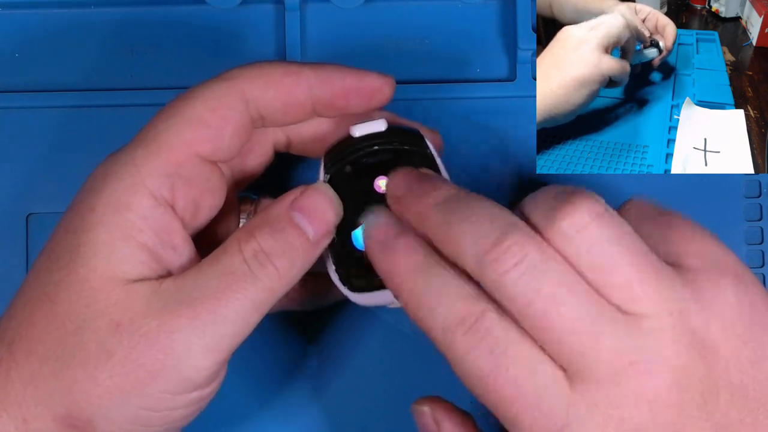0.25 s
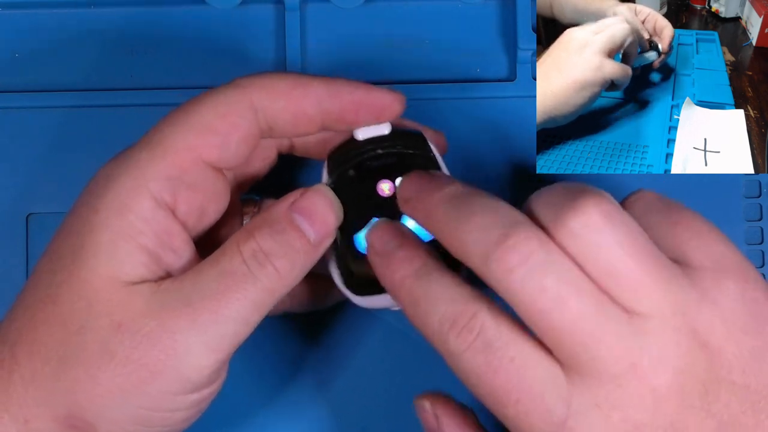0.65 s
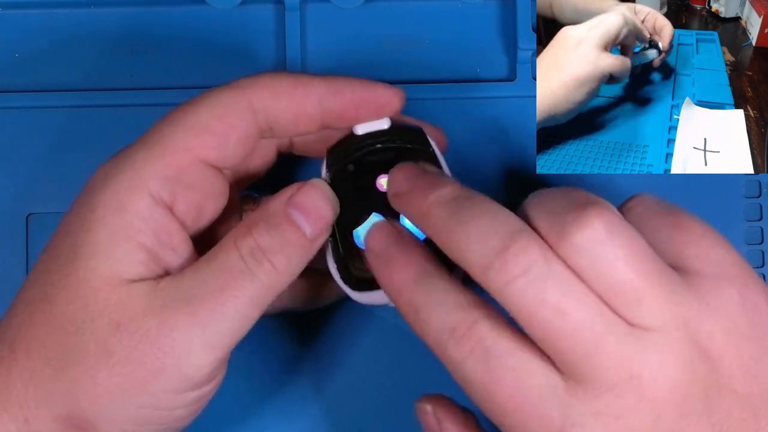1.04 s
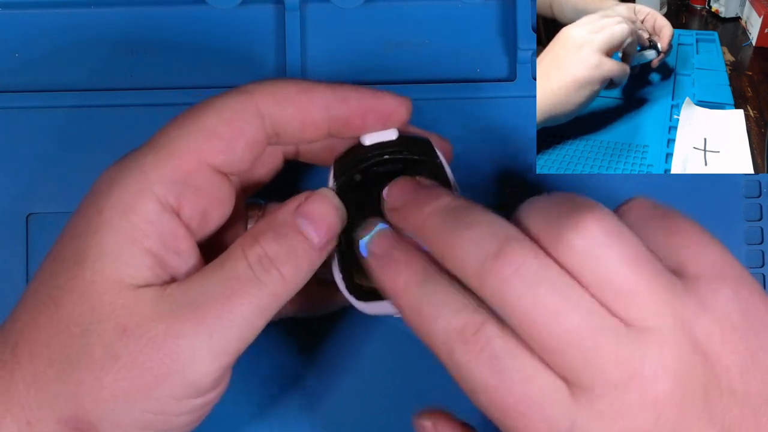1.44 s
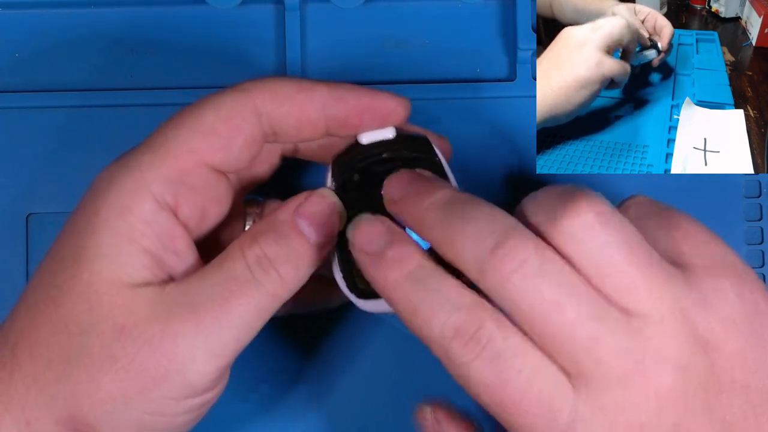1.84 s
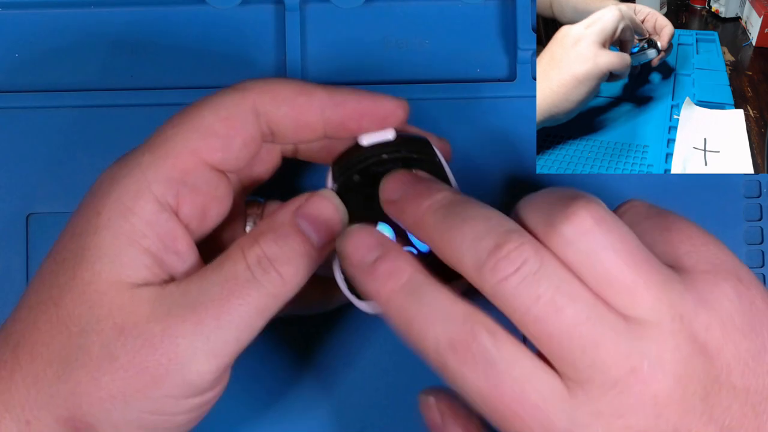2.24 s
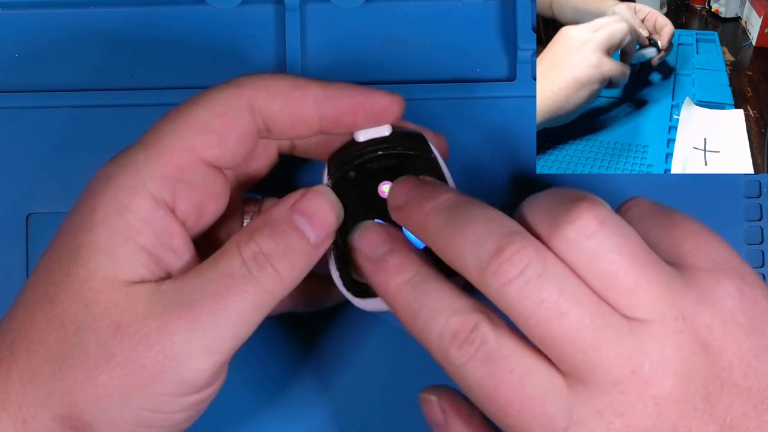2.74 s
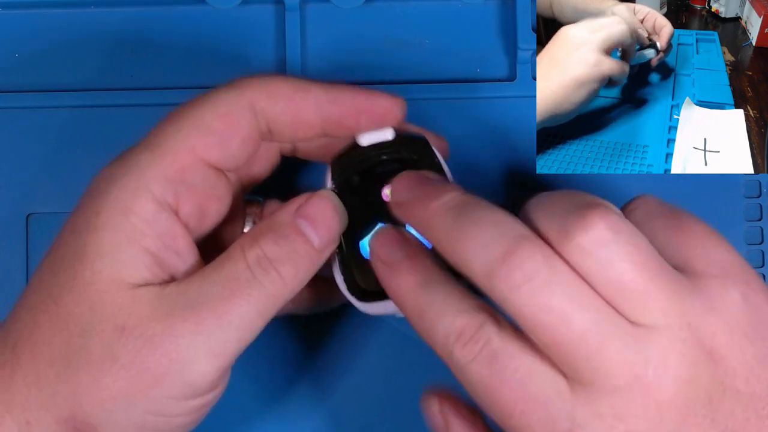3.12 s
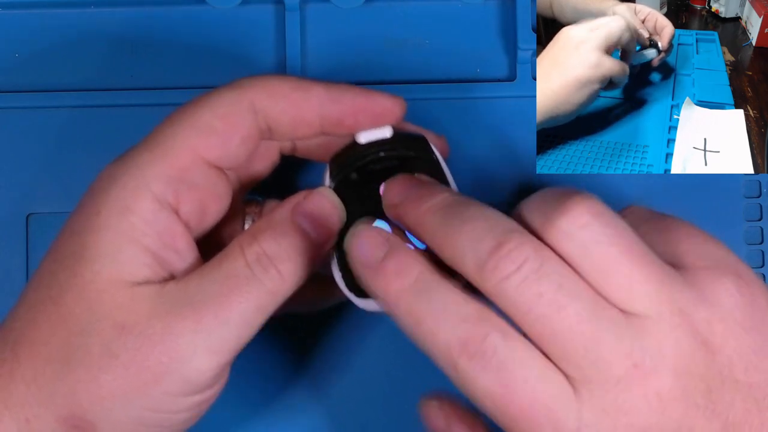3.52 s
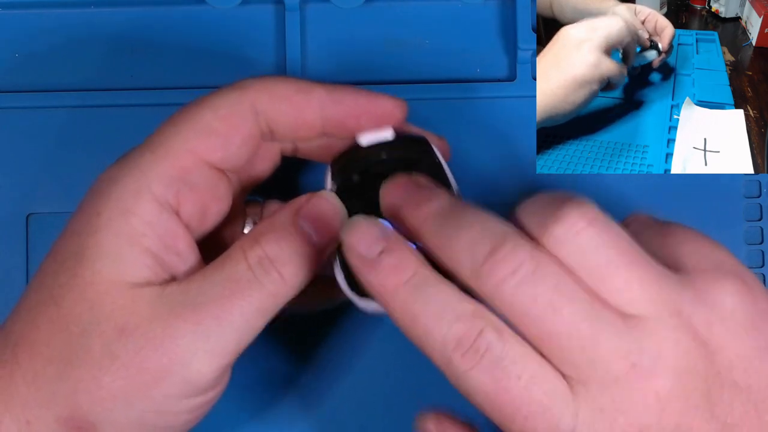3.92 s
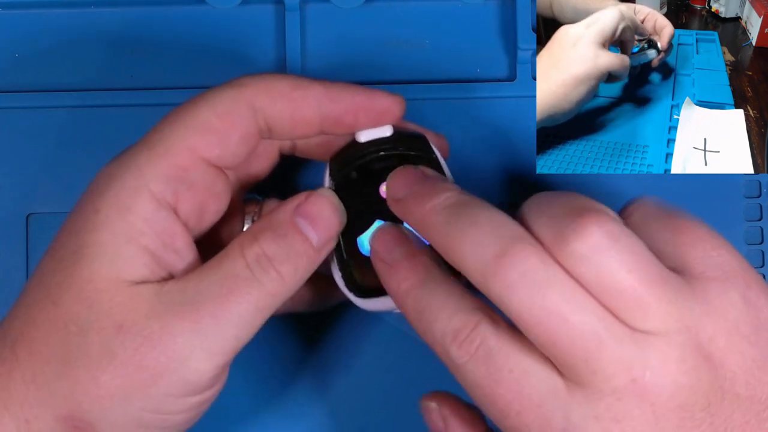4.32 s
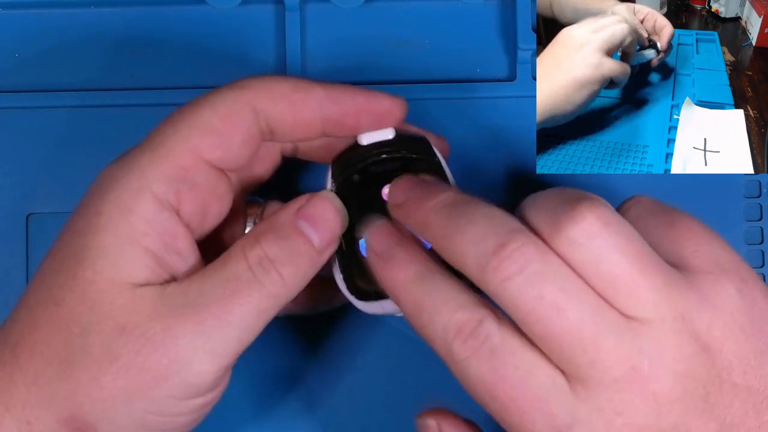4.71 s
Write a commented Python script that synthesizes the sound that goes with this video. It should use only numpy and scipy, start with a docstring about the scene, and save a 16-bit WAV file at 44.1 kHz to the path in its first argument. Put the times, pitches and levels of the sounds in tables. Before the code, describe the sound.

Fast, light fingertip taps make a small plastic toy watch tick and chatter in uneven clusters, with low desk bumps beneath in a quiet room.

```python
"""A small plastic toy watch, held over a desk, ticks under fast fingertip taps: its loose part strikes and
chatters in noisy contacts that ring the modes of the body, and a small room answers with sparse echoes. Soft
knocks sound on and near the desk top, hands rub and rustle in filtered noise, and desk jolts shake the
microphone stand, which rings very low with a locked overtone. Behind lie room hiss and thin electrical hum. A
noise suppressor turns everything down, the bass less, while the treble is weak."""
import sys
import numpy as np
from scipy import signal
from scipy.fft import rfft, irfft
from scipy.io import wavfile
from scipy.ndimage import uniform_filter1d

SR = 44100
rng = np.random.default_rng(int(sys.argv[2]) if len(sys.argv) > 2 else 0)


def inscribe(sig):
    """Save sig as 16-bit PCM at rate SR to the path in sys.argv[1].

    A 1-D sig is mono; a 2-D sig holds one channel per row.
    Samples are clipped to [-1, 1] before scaling.
    """
    pcm = np.round(np.clip(np.atleast_2d(sig).T, -1, 1) * 32767)
    wavfile.write(sys.argv[1], SR, pcm.astype(np.int16))


N = 218824

# Ticks of the loose part. Each row: time in seconds, level in dB, landing spot from 0 (case) to 1 (glass),
# extra level of the back lid's mode in dB.
TICKS = [(0.0151, -53, 0.05, 0), (0.0321, -40.5, 0.64, 4.5), (0.037, -43.5, 0.56, 4),
         (0.159, -52.5, 0.19, 1), (0.1703, -48.5, 0.057, 17), (0.1724, -40.5, 0.72, 2.5),
         (0.205, -52.5, 0.22, 3), (0.299, -57.5, 0.5, -5.0), (0.3033, -48.5, 0.56, 7),
         (0.3104, -39.5, 0.43, -0.5), (0.3282, -34.5, 0.86, 8), (0.3622, -45.0, 0.16, 1),
         (0.3644, -52, 0.98, -7), (0.473, -64, 0.35, 3), (0.4817, -50.5, 0.4, 5.5),
         (0.4895, -47.5, 0.29, 8.0), (0.63, -54, 0.14, -9), (0.6413, -50.5, 0.23, 4.5),
         (0.6542, -51, 0.74, 7), (0.7375, -57, 0.079, 17), (0.7498, -50, 0.73, 8), (0.8093, -47, 0.29, 1),
         (0.8965, -58.0, 0.2, 3), (0.9047, -49.5, 0.59, 1.5), (0.913, -46, 0.53, 8.5),
         (0.9616, -48.5, 0.066, 4.5), (0.9801, -50.5, 0.32, 1), (1.0618, -52.5, 0.05, 4),
         (1.073, -55, 1, 14.5), (1.1373, -53.5, 0.16, 2), (1.2203, -51, 0.16, 7.5), (1.23, -48.0, 0.46, 3),
         (1.3088, -54, 0.1, -1), (1.392, -53.5, 0.16, -2.0), (1.4022, -44.5, 0.67, 6.5),
         (1.416, -45.5, 0.74, 0), (1.4638, -55.5, 0.41, 3), (1.5604, -54, 0.28, -6),
         (1.6713, -53.5, 0.031, 5), (1.7344, -58.5, 0.032, 6.5), (1.8448, -52, 0.084, 9.5),
         (1.8592, -48.5, 0.16, -7), (1.9236, -45, 0.29, 1), (2.0189, -52.5, 0.035, -4),
         (2.0293, -52.5, 0.16, -6.0), (2.098, -51.5, 0.24, -4), (2.1058, -53, 0.37, 16),
         (2.1912, -50, 0.2, 2.5), (2.2729, -51.5, 0.08, 8), (2.2801, -48, 0.61, 1), (2.3161, -51, 0.46, 7),
         (2.3384, -46.5, 0.25, 0.5), (2.4318, -48.5, 0.45, 0), (2.4385, -49.5, 0.27, 1),
         (2.445, -49.0, 0.57, 3), (2.45, -45, 0.35, 3.5), (2.6887, -60, 0.47, 5), (2.693, -47.5, 0.35, 4),
         (2.7046, -42, 0.37, 4.5), (2.7099, -55, 0.38, 8.0), (2.7823, -39, 0.33, -20),
         (2.7908, -35.5, 0.76, -1.5), (2.7929, -34.5, 0.078, -5), (2.8017, -36, 0.28, -22),
         (2.873, -43, 0.34, 6), (2.8817, -47, 0.8, 11.5), (2.8872, -48.5, 0.17, 1),
         (2.9584, -45, 0.062, -6), (2.9636, -46, 0.14, 2.5), (3.0609, -46.5, 0.63, 2),
         (3.1287, -50, 0.31, 0), (3.1398, -47, 0.16, -1.5), (3.2053, -55, 0.33, 9),
         (3.2207, -51, 0.05, 8.0), (3.2324, -44, 0.62, 5), (3.2846, -65, 0.29, 14),
         (3.29, -45.0, 0.057, 2.5), (3.2942, -44.5, 0.44, 1), (3.3802, -48, 0.039, 5),
         (3.3885, -42.5, 0.35, 3.5), (3.3947, -44.5, 0.49, 2.5), (3.5399, -53.5, 0.05, 6.5),
         (3.7081, -53.5, 0.24, -2), (3.7144, -42.5, 0.46, -7), (3.718, -39.5, 0.17, -3.5),
         (3.7786, -43.5, 0.21, 0), (3.8028, -40.5, 0.35, 12.5), (3.8133, -43, 0.51, 8),
         (3.8142, -47, 0.2, -2), (3.8256, -52, 0.88, 5), (3.876, -39.5, 0.5, 0.5), (3.8885, -41, 0.19, -2),
         (3.8915, -58, 0.14, 4), (3.9623, -53.5, 0.55, 0.0), (4.0491, -48, 0.14, 2),
         (4.061, -52.5, 0.14, 1), (4.1372, -45.5, 0.31, 3.5), (4.1467, -45.5, 0.57, 1),
         (4.213, -44, 0.28, -2), (4.2243, -38.5, 0.26, -3.5), (4.3082, -45.0, 0.044, 0),
         (4.3204, -40.5, 0.71, 4.5), (4.333, -48, 0.65, 5), (4.399, -49.5, 0.041, -6),
         (4.467, -48.5, 0.27, -4), (4.5182, -51, 0.12, 1), (4.5532, -51.5, 0.093, -2),
         (4.633, -51.5, 0.23, 1), (4.7534, -56, 0.058, 1), (4.7776, -63.5, 0.046, 1),
         (4.8503, -56, 0.33, -6), (4.863, -60, 0.16, -1), (4.952, -50, 0.24, -3.0), (4.9579, -34, 0.36, -6)]
# Modes of the toy. Each row: frequency in Hz, width in Hz, level in dB struck on the case,
# level in dB struck on the glass.
TOY_MODES = [(1720, 10, -27, -36), (2700, 226, -9, -18), (3550, 2130, -13, -7), (4572, 210, -10, -3.5),
             (5620, 920, -4.5, -9), (6630, 370, -2, -18), (7754, 560, -1.5, -10.5), (9294, 440, -9, 7),
             (10910, 1200, -19.5, 11), (13200, 1500, -21, -5.5), (13800, 5800, -25.5, -4.5),
             (13700, 850, -38.5, -9.5)]
# Decay of the room. Each row: frequency in Hz, time to fall 60 dB in seconds.
ROOM_DECAY = [(2500, 0.45), (5000, 0.43), (9000, 0.25), (12000, 0.22), (15000, 0.29)]
# Colour of the room; the hands shade the low modes from it. Each row: frequency in Hz, level in dB.
ROOM_COLOUR = [(2700, -2), (3600, 0), (4600, -4), (6000, 0)]
# Dull knocks, the first two on the desk top and the last on a nearby object, all sounding through the same low
# modes. Each row: time in seconds, level in dB, tilt in dB per octave above the lowest mode, # rise in ms,
# share of the free ring time.
KNOCKS = [(0.7724, -51, -5, 3.6, 0.89), (0.7796, -50, -4, 2.1, 1), (0.919, -67.5, 3, 0.7, 0.61)]
# Modes of the desk top. Each row: frequency in Hz, free time to fall about 30 dB in seconds, level in dB.
DESK_MODES = [(131, .035, 0), (350, 0.016, 5), (540, 0.011, 3), (845, 0.011, 5), (1310, 0.007, 2)]
# Jolts of the desk. Each row: peak time in seconds, relative stand level in dB, overtone in dB below that
# (before the mix gains), time to fall 60 dB in seconds.
JOLTS = [(0.062, -56.5, 4, 0.59), (0.164, -50.5, 23, 0.17), (0.266, -52.5, 19, 0.29),
         (0.344, -53.5, 5, 0.23), (0.512, -61, 8, 0.34), (0.68, -61.5, 19, 0.16), (0.991, -52.5, 9, 0.31),
         (1.207, -56, 17, 0.42), (1.444, -54, 22, 0.18), (1.905, -52, 15, 0.48), (2.144, -58.5, 8, 0.33),
         (2.331, -42, 13, 0.45), (2.467, -45.5, 19.5, 0.49), (2.669, -44.5, 15, 0.69),
         (2.821, -42, 9, 0.36), (2.915, -43, 4.5, 0.28), (3.05, -51.5, 4, 1), (3.23, -40, 7, 0.63),
         (3.334, -42.5, 12.5, 0.63), (3.481, -48, 5, 0.92), (3.781, -38, 3.5, 0.82),
         (4.185, -39.5, 7, 0.19), (4.28, -41.5, 10, 0.4), (4.348, -45.5, 6.5, 0.35),
         (4.533, -46, 3.5, 0.45), (4.878, -51, 13, 0.95)]
# Spectrum of the slow pushes. Each row: frequency in Hz, relative density in dB per Hz.
THUMP_SPECTRUM = [(8, 1.5), (26, -12), (45, -25.5), (90, -24), (140, -31), (200, -68.5)]
# Spectrum of the hand rustle. Each row: frequency in Hz, relative density in dB per Hz.
RUSTLE_SPECTRUM = [(70, -14.5), (120, -2), (210, 2), (310, -1), (450, -7.5), (700, -25), (2000, -84)]
# Hands rubbing the desk. Each row: start in seconds, length in seconds, relative level in dB, pitch in Hz.
RUBS = [(-.02, .12, -64.5, 278), (0.045, 0.052, -84, 407), (1.412, 0.107, -78.5, 296),
        (2.992, 0.19, -70, 280), (3.218, 0.098, -69, 265), (3.309, 0.13, -74.5, 321),
        (3.921, 0.055, -76, 332), (4.176, 0.046, -74, 368)]
# Spectrum of the room hiss. Each row: frequency in Hz, relative density in dB per Hz.
HISS_SPECTRUM = [(59, -28.5), (100, -4.5), (163, -9), (736, -27.5), (2170, -30), (2800, -12.5), (3700, -29),
                 (4570, -19.5), (7610, -21), (16000, -27.5)]
# Electrical hum. Each row: frequency in Hz, rms level in dB.
HUM = [(199.2, -92), (597.5, -104), (1001, -103.5)]
# Left-right likeness of all noises. Each row: frequency in Hz, likeness from 0 to 1.
LIKENESS = [(60, 0.95), (300, 0.77), (1400, 0.86), (15000, 0.7)]

LID_MODE = 3  # place of the back lid's mode in TOY_MODES
REBOUND_MS, REBOUND_DB = 5.0, -8  # average delay and relative level of the rebound
ROOM_DB, HISS_DB = -2.5, -80
STAND_HZ, STAND_PAN_DB = 30, -0.4  # pans are left over right
JOLT_RISE_S, REST_DB = 0.024, -71  # swing build-up, and its relative level at rest
PUSH_DB, PUSH_S = -10.5, 0.0058  # short shove at each jolt's peak, relative to the jolt
STIR_DB, STIR_SWING_DB, STIR_SHARE = -75, -40.5, 0.43  # rustle level at this swing; dB of rustle per dB of swing
RUB_EDGE_S, RUB_WIDTH_HZ, RUB_PAN_DB = 0.012, 72, 2.5
BASS_CUT = 0.37  # share of the suppressor's cut, in dB, that also reaches the bass
EDGE_HZ = 15900  # upper band limit


def amp(db):
    """Turn dB into an amplitude factor."""
    return 10 ** (np.asarray(db) / 20)


def evened(x):
    """Scale to an rms of one."""
    return x / np.sqrt(np.mean(x ** 2) + 1e-20)


def read(points, hz):
    """Read a curve between its points along a logarithmic frequency axis."""
    f, value = np.transpose(points)
    return np.interp(np.log(hz + 1), np.log(f + 1), value)


def noise(spectrum):
    """Two partly alike channels of noise with the given spectrum, at an rms of one."""
    hz = np.fft.rfftfreq(N, 1 / SR)
    left, other = rfft(rng.standard_normal((2, N)))
    same = np.clip(read(LIKENESS, hz), 0, 1)
    right = same * left + np.sqrt(1 - same ** 2) * other
    return evened(irfft(np.array([left, right]) * amp(read(spectrum, hz)), N))


def ring(hz, width, t):
    """One exponentially dying mode with a soft start; a wider mode dies faster."""
    return np.sin(2 * np.pi * hz * t) * np.exp(-np.pi * width * t) * (1 - np.exp(-t / .00016))


def rattles():
    """The loose part rebounds: each tick gets one weaker tick just after it, landing close by."""
    rebounds = []
    luck = rng.random((len(TICKS), 2))
    for (s, db, spot, lid_db), (late, slip) in zip(TICKS, luck):
        delay_s = REBOUND_MS * (.5 + late) / 1000
        rebounds.append((s + delay_s, db + REBOUND_DB, spot * (.5 + slip), lid_db))
    return [tick for tick in list(TICKS) + rebounds if tick[0] < N / SR]


def part_contacts(count):
    """The part strikes, chatters and skips to rest: sparse random contacts under a dying envelope."""
    t = np.arange(2000) / SR
    hits = rng.standard_normal((count, 2000)) * (rng.random((count, 2000)) < .22)
    skips = np.repeat(rng.random((count, 40)) < .12, 50, axis=1)  # brief late contacts
    strike = (1 - np.exp(-t / 0.0007)) * np.exp(-t / 0.003)
    return hits * (strike + 0.53 * skips * np.exp(-t / 0.02))


def toy_body(spot, lid_db, luck):
    """Modes of the case and glass, weighted by landing spot and slightly retuned by the fingers' grip."""
    t = np.arange(400) / SR
    spot = np.clip(spot, 0, 1)
    shift_db = 1.6 * luck[:, 0]
    shift_db[LID_MODE] += lid_db
    grip = 1 + .04 * luck[:, 1]
    body = np.zeros(len(t))
    for k, (hz, width, case_db, glass_db) in enumerate(TOY_MODES):
        level_db = case_db + spot * (glass_db - case_db) + shift_db[k]
        direction = (-1) ** k  # neighbouring modes start in opposite directions
        body += direction * amp(level_db) * np.sqrt(width) * ring(hz * grip[k], width, t)
    return body


def toy():
    """Each tick is a scatter of contacts exciting the toy's modes, with the lows of the sum filtered away."""
    out = np.zeros(N + 2600)
    ticks = rattles()
    spread = rng.standard_normal((len(ticks), len(TOY_MODES), 2))
    for (s, db, spot, lid_db), contacts, luck in zip(ticks, part_contacts(len(ticks)), spread):
        tick = np.convolve(contacts, toy_body(spot, lid_db, luck))
        tick /= 3 * tick[:180].std()  # the peak is about three times the rms of the first 4 ms
        at = round(s * SR)
        out[at:at + len(tick)] += amp(db) * tick
    return signal.sosfilt(signal.butter(5, 2250, "high", fs=SR, output="sos"), out[:N])


def room(x):
    """Sparse echoes of random sign, mostly shared by both channels, each band dying at its own speed."""
    taps = np.zeros((3, SR // 2))
    at = np.arange(120, SR // 2 - 12, 12)
    at = at + rng.integers(0, 12, (3, len(at)))  # one echo at a random place in each short slot
    np.put_along_axis(taps, at, rng.choice([-1., 1.], at.shape), 1)
    hz, t, bands = signal.stft(taps[0] + 0.91 * taps[1:], SR, nperseg=128)
    decay_db = -60 * t / read(ROOM_DECAY, hz)[:, None]
    build_up = 1 - np.exp(-t / 0.0034)
    bands = bands * amp(read(ROOM_COLOUR, hz)[:, None] + decay_db) * build_up
    tail = signal.istft(bands, SR, nperseg=128)[1]
    return signal.fftconvolve(x[None], tail / np.linalg.norm(tail[0]), axes=1)[:, :N]


def knocks():
    """Soft blows ring a shared set of low modes, those of the desk top; a tilt per blow favours the upper or
    lower modes."""
    t = np.arange(N) / SR
    out = np.zeros(N)
    for at, db, tilt_db, rise_ms, free in KNOCKS:
        since = np.maximum(t - at, 0)
        modes = np.zeros(N)
        for hz, fall_s, mode_db in DESK_MODES:
            octaves = np.log2(hz / DESK_MODES[0][0])
            modes += amp(mode_db + tilt_db * octaves) * ring(hz, 1.08 / (free * fall_s), since)
        out += amp(db) * modes * (1 - np.exp(-(1000 * since / rise_ms) ** 2))
    return out


def rubs():
    """Skin drags in lumps: noise through a doubled resonance, dull and with its own pitch each time."""
    t = np.arange(N) / SR
    out = np.zeros((2, N))
    drag = noise([(SR, 0)])  # a single point makes a flat spectrum
    for s, length, db, hz in RUBS:
        b, a = signal.iirpeak(hz, hz / RUB_WIDTH_HZ, SR)
        to_edge = np.minimum(t - s, s + length - t)
        shape = np.clip(to_edge / RUB_EDGE_S + .5, 0, 1) ** 2
        tone = signal.lfilter(b, a, signal.lfilter(b, a, drag))
        out += amp(db) * shape * evened(tone)
    return out


def desk():
    """Jolts swing the stand at a drifting pitch with a locked overtone; pushes, rustle and rubs go along."""
    t = np.arange(N) / SR
    swing_power = np.full(N, amp(REST_DB) ** 2)
    overtone_power = swing_power.copy()
    shoves = np.zeros(N)
    for s, db, under_db, t60 in JOLTS:
        u = (t - s) / PUSH_S
        shoves += amp(db + PUSH_DB) * (1 - u ** 2) * np.exp(-.5 * u ** 2)
        rise = np.exp(-((t - s) / JOLT_RISE_S) ** 2)
        fall = amp(-120 * np.maximum(t - s, 0) / t60)  # as power, so 60 dB per t60
        power = amp(2 * db) * np.where(t < s, rise, fall)
        swing_power += power
        overtone_power += power * amp(-2 * under_db)
    swing, overtone = np.sqrt(swing_power), np.sqrt(overtone_power)
    rustle = amp(STIR_DB) * (swing / amp(STIR_SWING_DB)) ** STIR_SHARE
    drift = evened(uniform_filter1d(uniform_filter1d(rng.standard_normal(N), 3000), 3000))
    phase = 2 * np.pi * np.cumsum(STAND_HZ + 2.4 * drift) / SR
    stand = swing * (1.59 * np.cos(phase) + 1.09 * noise(THUMP_SPECTRUM))
    stand = stand + overtone * 1.28 * np.cos(2 * phase) + shoves
    side = np.array([[.5], [-.5]])  # half of each pan on either channel
    hands = rustle * noise(RUSTLE_SPECTRUM) + amp(RUB_PAN_DB * side) * rubs()
    return amp(STAND_PAN_DB * side) * stand + hands


def background():
    """Room hiss as shaped noise, and thin electrical hum as steady sines."""
    t = np.arange(N) / SR
    hum = sum(amp(db) * np.sqrt(2) * np.sin(2 * np.pi * hz * t) for hz, db in HUM)
    return amp(HISS_DB) * noise(HISS_SPECTRUM) + hum


def scene():
    """Toy and knocks with their room, over the desk and the background."""
    ticks, blows = toy(), knocks()
    # the knocks reach the microphone mostly through its stand, so less of them fills the room
    echoes = amp(ROOM_DB) * room(ticks + 0.52 * blows)
    return ticks + blows + echoes + desk() + background()


def record(dry):
    """The suppressor lowers everything, the bass less, when the treble is weak; then the band limit."""
    low = signal.sosfiltfilt(signal.butter(2, 150, fs=SR, output="sos"), dry)
    treble = signal.sosfilt(signal.butter(2, 2000, "high", fs=SR, output="sos"), dry.mean(0))
    level_db = 10 * np.log10(abs(uniform_filter1d(treble ** 2, 900)) + 1e-12)
    # half a dB of cut per dB below the threshold, 16 dB at most
    cut_db = np.clip(0.5 * (level_db + 61.5), -16, 0)
    cut_db = uniform_filter1d(cut_db, 600)
    out = low * amp(BASS_CUT * cut_db) + (dry - low) * amp(cut_db)
    band_limit = signal.firwin(511, EDGE_HZ, window=("kaiser", 9), fs=SR)
    return signal.oaconvolve(out, band_limit[None], "same")


dry = scene()
out = record(dry)
inscribe(out)
```